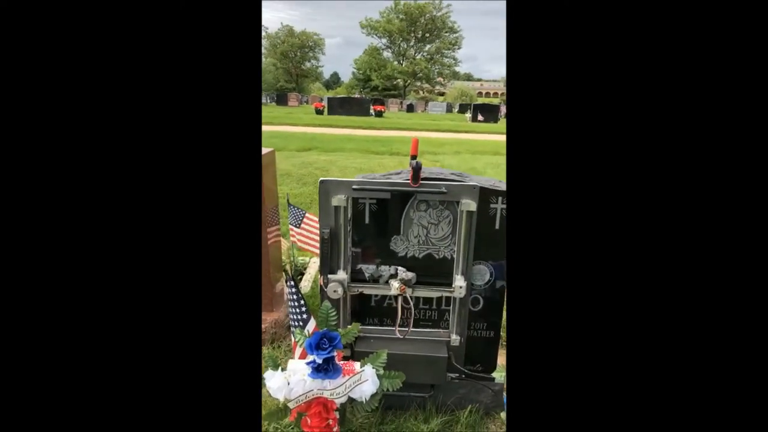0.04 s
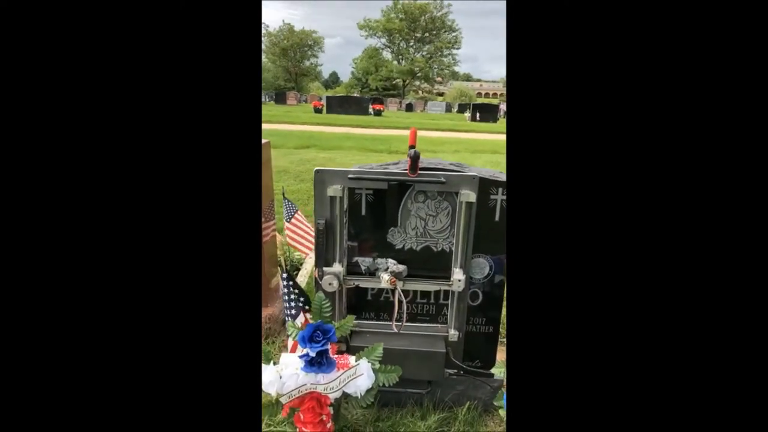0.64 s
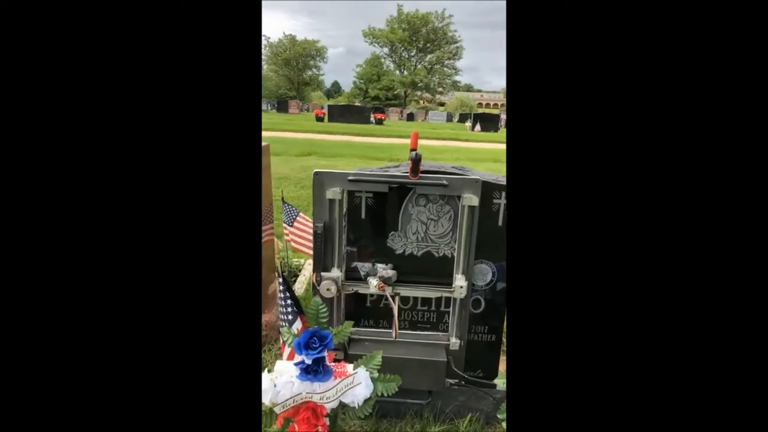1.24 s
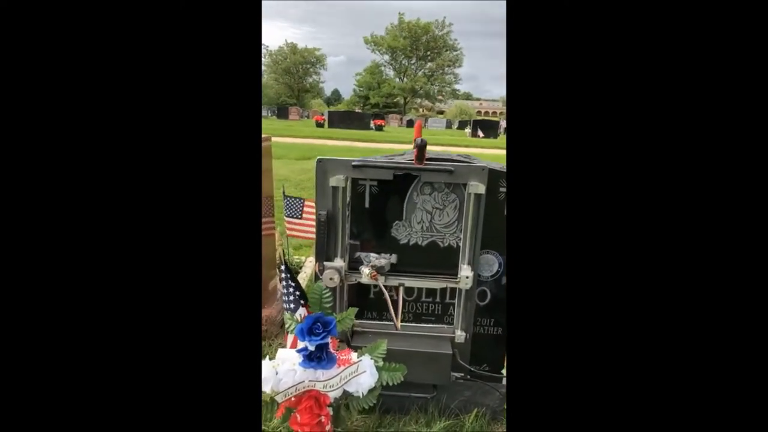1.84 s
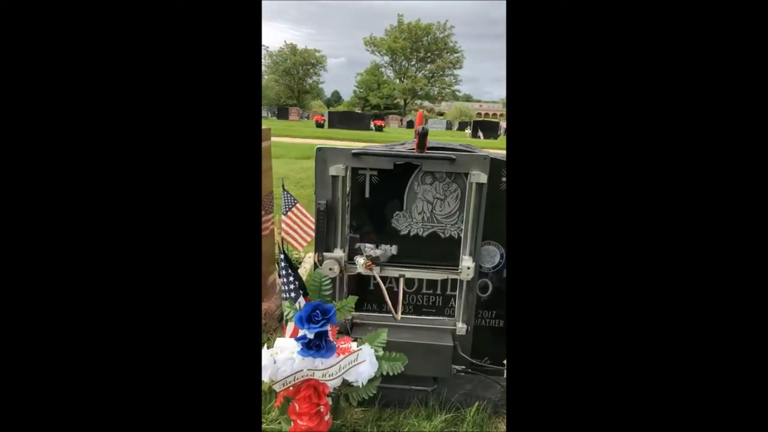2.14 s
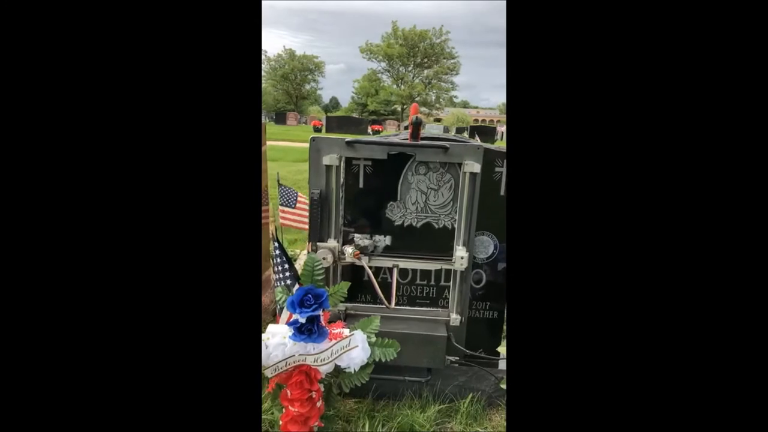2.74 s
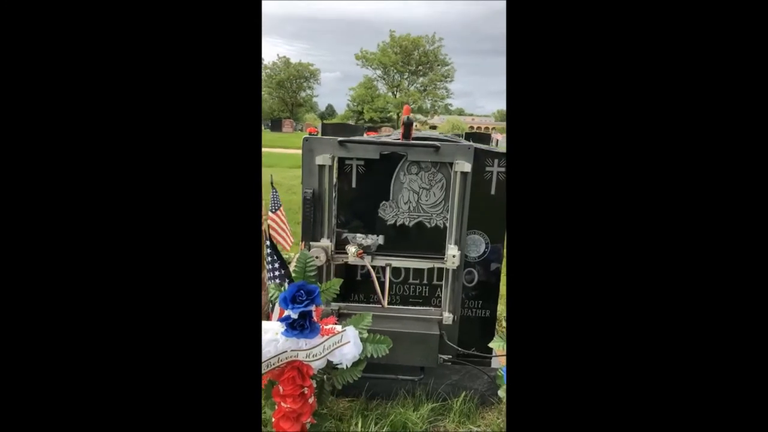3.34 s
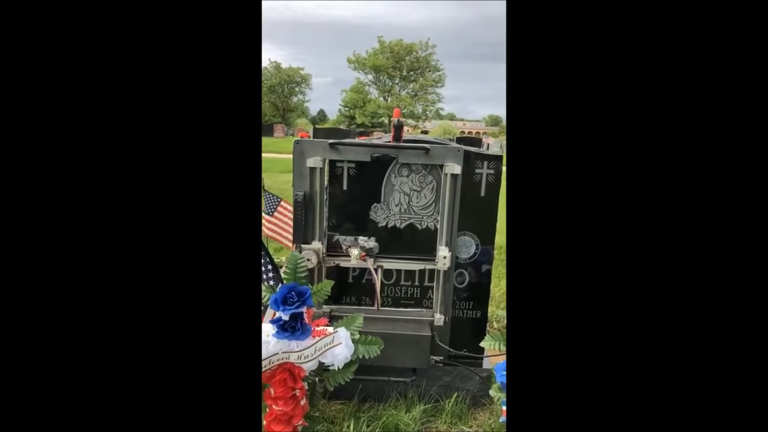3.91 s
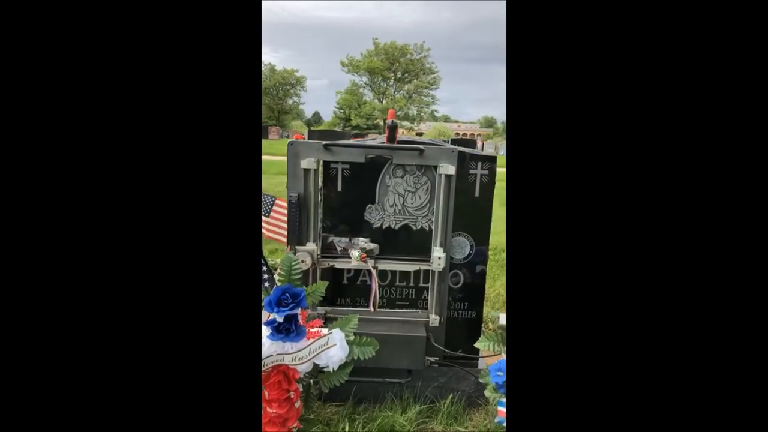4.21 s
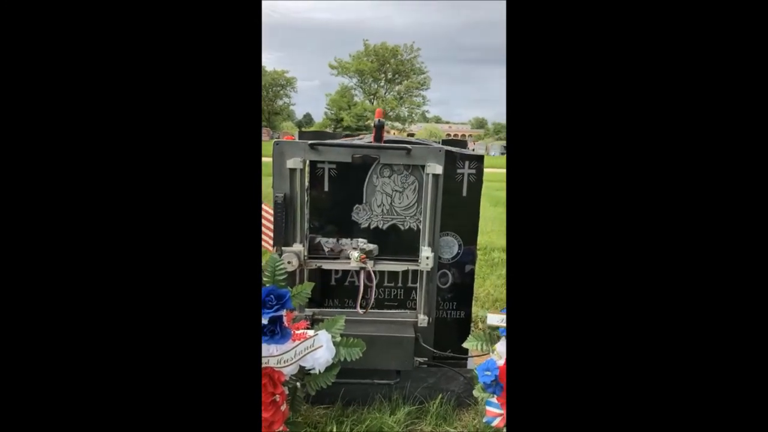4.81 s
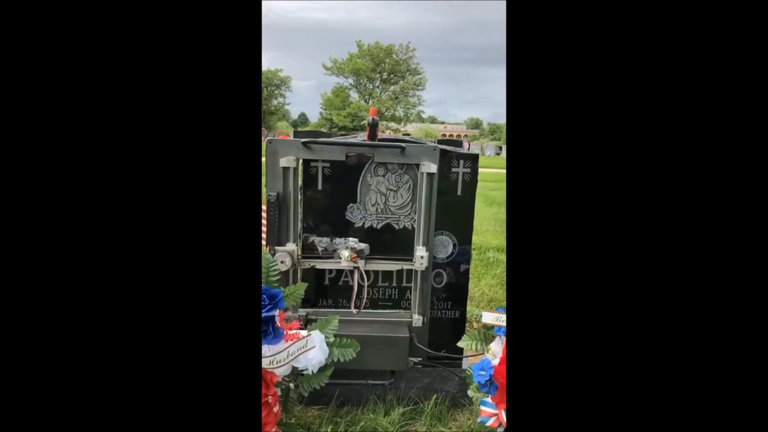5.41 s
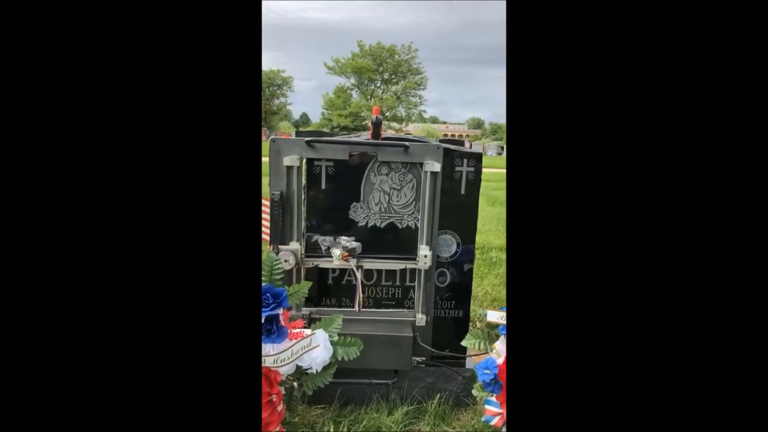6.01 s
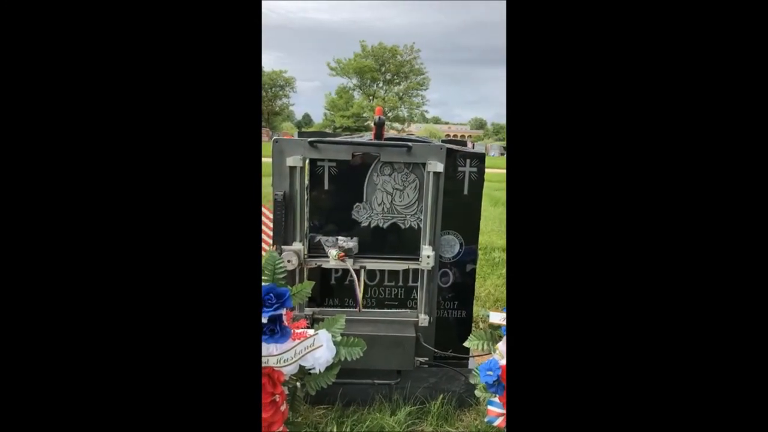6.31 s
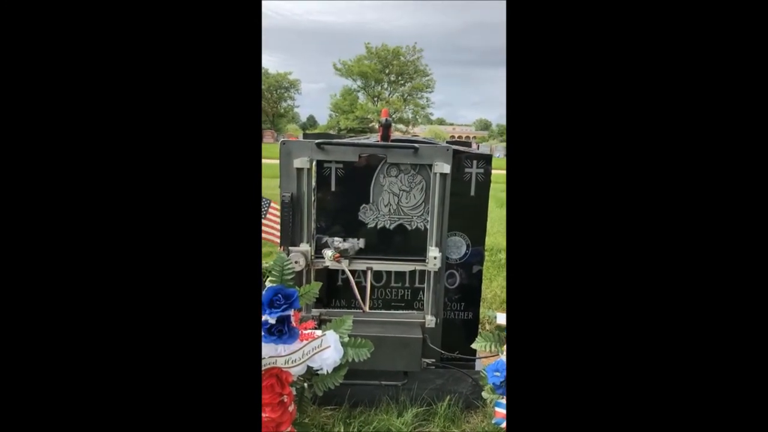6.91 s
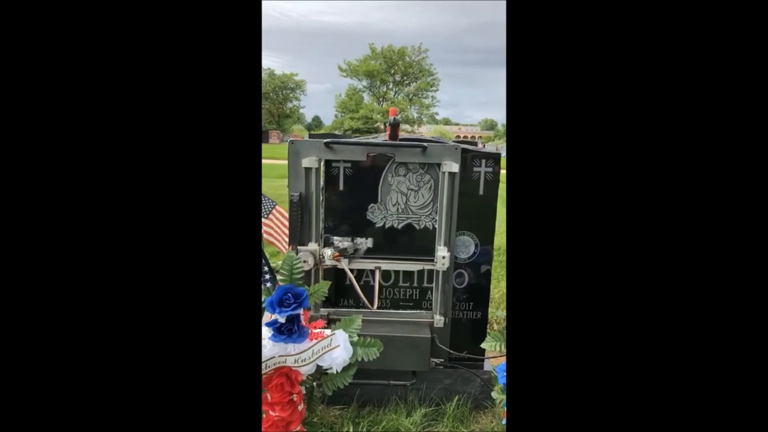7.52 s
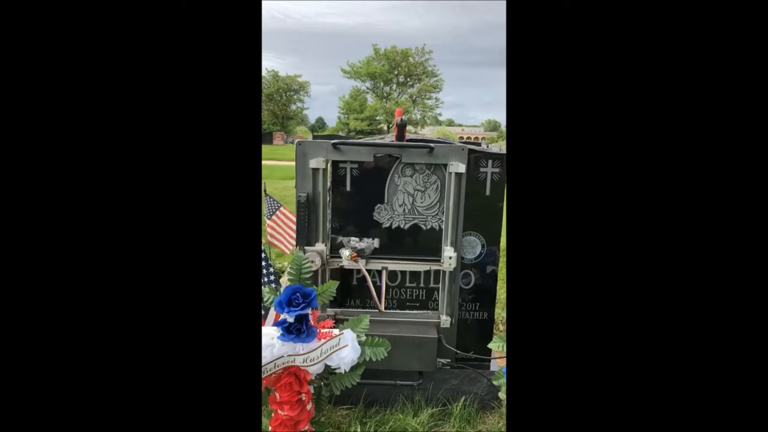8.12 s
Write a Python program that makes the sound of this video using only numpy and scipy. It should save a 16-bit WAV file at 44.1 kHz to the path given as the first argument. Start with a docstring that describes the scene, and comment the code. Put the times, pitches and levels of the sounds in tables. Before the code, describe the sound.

Gusts of wind thump and rumble on the microphone while a nearby machine engraves granite in the open air. The tip gives a rasping, crunchy buzz with a bright metallic ring, running throughout in uneven strokes and sometimes digging in with a sharper scratch. The wind is light at first, blows hardest through the middle and later part, and dies down near the end as the buzzing carries on.

```python
"""Outdoors, a step or two from a polished granite headstone, where an impact engraver is at work.
Its tip hammers hundreds of times a second. Brittle fracture of the stone gives a broadband crunch,
and the blows excite the modes of the stylus, metal head, rails and frame; the ringing changes as the
carriage shifts. Turbulent gusts buffet the microphone with puffs, thumps and a low rumble,
over a faint wash of open air."""
import sys
import numpy as np
from scipy import signal
from scipy.fft import rfft, irfft, next_fast_len
from scipy.io import wavfile
from scipy.ndimage import uniform_filter1d

SR = 44100
rng = np.random.default_rng(int(sys.argv[2]) if len(sys.argv) > 2 else 0)


def wav_out(sig):
    """Save sig, one row per channel (or a flat mono array), as 16-bit PCM at SR to the path in sys.argv[1]."""
    wavfile.write(sys.argv[1], SR, np.round(np.clip(np.atleast_2d(sig).T, -1, 1) * 32767).astype(np.int16))


N = 359415
TIME = np.arange(N) / SR
BINS_HZ = np.fft.rfftfreq(4096, 1 / SR)

# Levels in the tables are relative; each source applies its own gain.
# Spectrum of the open air: frequency_hz, density_db
AIR_SPECTRUM = [(20, -49), (70, 8), (200, -9.5), (450, -1.5), (800, -7), (1300, -9), (3000, -57),
                (12000, -8)]
# Spectrum of the large eddies: frequency_hz, density_db
RUMBLE_SPECTRUM = [(20, -51), (30, -17), (45, -7), (70, -1.5), (110, -4), (180, -13.5), (400, -40),
                   (1000, -84)]
# Spectra of the wind in a lull, a gust and a squall: frequency_hz, density_db
LULL_SPECTRUM = [(30, -44), (80, 1.5), (170, 2.5), (270, -3), (480, -8.5), (800, -23.5), (1500, -69),
                 (4000, -79)]
GUST_SPECTRUM = [(30, -23), (80, -12.5), (170, 2.5), (350, -4.5), (500, -2.5), (850, -16.5), (1300, -31.5),
                 (2000, -53), (4000, -45)]
SQUALL_SPECTRUM = [(30, -40), (80, 8.5), (170, 3.5), (350, 0.5), (500, 2), (850, -10.5), (1300, -16),
                   (2000, -21.5), (4000, -50)]
# The breeze between puffs: time_s, level_db
BREEZE_LEVELS = [(0, -71.5), (.42, -78.5), (.55, -66), (1.05, -75), (1.8, -68), (2.2, -74.5), (2.55, -71),
                 (2.9, -62), (3.7, -61.5), (4.4, -71), (5.3, -73), (6.1, -66), (6.7, -63), (6.9, -73),
                 (7.7, -77.5), (8.15, -72.5)]
# Puffs of wind on the microphone: middle_s, length_s, level_db, thud_db
WIND_PUFFS = [(0.309, 0.026, -65, -77), (0.516, 0.088, -48.5, -58), (0.585, 0.14, -55, -58),
              (0.665, 0.03, -51, -54), (0.699, 0.048, -54.0, -71), (0.781, 0.056, -48.5, -53),
              (0.881, 0.11, -54.5, -60), (0.971, 0.079, -52.5, -61), (1.036, 0.064, -53.5, -58.5),
              (1.197, 0.1, -56.5, -58), (1.382, 0.04, -58.5, -72), (1.432, 0.026, -59, -77),
              (1.49, 0.038, -62, -78), (1.588, 0.07, -60.5, -71), (1.714, 0.064, -71, -73),
              (2.07, 0.086, -65, -78), (2.353, 0.033, -60, -69), (2.428, 0.022, -61.5, -80),
              (2.507, 0.077, -64.5, -78), (2.665, 0.046, -51, -57), (2.779, 0.035, -47.5, -65),
              (2.863, 0.12, -50, -54.5), (2.996, 0.056, -51, -53), (3.065, 0.071, -46.0, -62),
              (3.183, 0.19, -55.5, -56), (3.326, 0.045, -44.5, -58), (3.398, 0.03, -54.5, -63),
              (3.495, 0.067, -51, -51.5), (3.63, 0.083, -43, -51), (3.737, 0.12, -42.5, -54),
              (3.837, 0.042, -42.5, -55), (3.969, 0.041, -48.5, -68), (4.047, 0.065, -46.0, -64),
              (4.116, 0.069, -45.5, -60), (4.286, 0.15, -52.5, -76), (4.483, 0.088, -55, -59),
              (4.597, 0.071, -48, -52), (4.659, 0.03, -46.5, -64), (4.716, 0.12, -54, -55.5),
              (4.895, 0.078, -51.5, -68), (5.014, 0.063, -49, -61), (5.129, 0.046, -47.5, -57),
              (5.325, 0.12, -61.5, -67.5), (5.5, 0.099, -51, -65), (5.58, 0.055, -48.5, -67),
              (5.655, 0.089, -48.0, -67), (5.691, 0.045, -56.0, -64), (5.749, 0.11, -53, -66),
              (5.869, 0.043, -49.5, -72), (5.947, 0.092, -48.5, -66), (6.05, 0.047, -43.5, -68),
              (6.138, 0.11, -45.5, -48.5), (6.205, 0.042, -47, -72), (6.294, 0.092, -45.5, -63),
              (6.367, 0.031, -47, -45), (6.433, 0.037, -44, -51), (6.51, 0.1, -49.5, -62),
              (6.584, 0.081, -50, -56), (6.694, 0.065, -46.5, -57), (6.773, 0.1, -49.5, -53),
              (6.916, 0.04, -53.5, -57), (6.982, 0.077, -53, -62), (7.03, 0.099, -57, -79),
              (7.12, 0.046, -53.5, -65), (7.193, 0.06, -54.5, -69), (7.28, 0.069, -60, -74),
              (7.35, 0.036, -57, -72), (7.448, 0.076, -56.5, -61.5), (7.56, 0.091, -60.5, -70),
              (7.799, 0.026, -54, -55), (8.035, 0.097, -68, -76)]
# Single eddies that strike the microphone: middle_s, level_db, pitch_hz
EDDY_STRIKES = [(0.545, -38, 537), (0.664, -34.5, 490), (0.905, -40, 370), (1.025, -37, 317),
                (1.05, -40.5, 337), (2.665, -38, 304), (2.845, -36, 415), (3.045, -33.5, 534),
                (3.081, -35, 533), (3.311, -34.5, 383), (3.343, -32, 388), (3.49, -36, 433),
                (3.607, -30.5, 452), (3.632, -33, 456), (3.648, -28, 540), (3.733, -27, 617),
                (3.744, -31, 616), (3.774, -32, 457), (3.843, -34, 570), (4.061, -33, 664),
                (4.109, -40, 370), (4.564, -38.5, 380), (4.594, -42, 490), (5.497, -35, 395),
                (5.564, -40.5, 453), (5.582, -36, 510), (5.925, -36.5, 490), (6.047, -35, 338),
                (6.139, -31, 386), (6.218, -36.5, 396.6), (6.281, -37, 484), (6.312, -32.5, 800),
                (6.362, -33.5, 476), (6.433, -28.5, 517), (6.473, -34, 470), (6.59, -38, 494),
                (6.698, -28.5, 540), (6.8, -35, 423), (6.962, -32.5, 310)]
# Cuts, with the tip down on the stone: start_s, length_s, start_db, end_db
TIP_CUTS = [(-0.008, 0.21, -53.5, -55.5), (0.195, 0.076, -63.5, -57), (0.354, 0.28, -58.5, -54),
            (0.764, 0.17, -55.5, -55.5), (1.032, 0.22, -54, -57), (1.306, 0.082, -56, -55),
            (1.48, 0.062, -57.5, -52), (1.545, 0.041, -55, -49), (1.606, 0.065, -51.5, -55.4),
            (1.687, 0.11, -58, -52), (1.785, 0.1, -55.5, -53.5), (1.902, 0.073, -60, -53),
            (1.978, 0.387, -54.5, -58), (2.339, 0.32, -56, -59.6), (2.807, 0.35, -58.5, -56.5),
            (3.153, 0.35, -56.0, -55), (3.617, 0.18, -54, -57.5), (3.8, 0.048, -56.5, -54.5),
            (3.864, 0.14, -60, -61), (4.07, 0.13, -56.5, -57.5), (4.2, 0.24, -57.5, -54),
            (4.529, 0.184, -56.1, -55.0), (4.845, 0.28, -51.5, -61.5), (5.18, 0.31, -61.6, -52),
            (5.618, 0.16, -55.0, -52), (5.866, 0.17, -55, -62.5), (5.979, 0.18, -55.0, -62.5),
            (6.173, 0.087, -53, -70), (6.51, 0.234, -60, -56), (6.793, 0.073, -56, -68),
            (6.877, 0.32, -58.5, -57), (7.2, 0.33, -56, -60), (7.702, 0.45, -58.5, -57)]
# Moments when the tip digs in hard: peak_s, level_db
TIP_DIGS = [(0.776, -60), (1.138, -52.5), (1.319, -56), (1.69, -50.5), (2.014, -54), (2.042, -54),
            (2.799, -54), (2.848, -60), (3.316, -51), (3.485, -51), (3.769, -60), (3.827, -57),
            (3.89, -48.5), (4.545, -58), (4.563, -52), (4.987, -54), (5.041, -52.5), (5.198, -58),
            (5.743, -58), (5.791, -51), (6.0, -55), (6.178, -53.5), (6.369, -52), (6.432, -50),
            (6.492, -49.5), (6.573, -58), (6.616, -53), (6.668, -59), (6.774, -53), (6.962, -57),
            (7.195, -52.5), (7.784, -53.5), (7.972, -55.5)]
# Spectrum of crumbling granite: frequency_hz, density_db
CRUNCH_SPECTRUM = [(200, -20.5), (800, -5), (1500.0, -5.5), (2000.0, -7), (2700.0, -3), (3800.0, 2.5),
                   (4600.0, 1), (5600.0, 1.5), (7200.0, 4), (8600.0, 3), (9600.0, -1.5), (10400.0, -1.5),
                   (11700.0, -3)]
# Carriage travel and how freely the head rings: time_s, rail_place (above 2 acts as 2), ring_db
CARRIAGE_PATH = [(0, 0.26, 1), (.9, 0, 1.5), (1.3, 0.31, 0.5), (1.65, 0.67, -0.5), (1.95, 0.96, 0.5),
                 (2.4, 1.35, 3.5), (3.0, 1.3, 3.5), (3.2, 1.9, 1.5), (3.65, 2, 1), (5.0, 2.77, 1),
                 (6.8, 2.8, 2), (7.05, 1.85, 3), (7.3, 1.66, 2.5), (8.15, 1.68, 3)]
# Modes of the head and rails: pitch_hz, width_hz, place_0_db, place_1_db, place_2_db
HEAD_MODES = [(1820, 180, 3, -4, -18), (2030, 300, -18, 2, 2), (2450, 160, 6, 9, 0), (2610, 190, -18, 1, 8),
              (2795, 160, 15, 12, 17), (2900, 140, 13, -8, 14), (3030, 150, 11, -6, 11),
              (3170, 260, -18, 9, 5), (3550, 170, 13, 0, 7), (3750, 260, 3, 3, -16), (4110, 340, -4, 1, 3),
              (4980, 340, 2, 1, 1), (5390, 130, 1, -3, 5), (5640, 240, 8, 4, 4), (6170, 360, 0, 4, 4),
              (6690, 380, 3, -3, 0), (7930, 380, 3, 6, 6), (8460, 380, 2, 5, 5), (8970, 260, 11, 10, 5),
              (9360, 380, 2, 2, -3), (9720, 380, 2, 2, 2), (10200, 260, 2, -4, -4), (10700, 150, 4, 0, 0),
              (11000, 130, -2, 0, 0), (11420, 220, 3, 3, 3)]
# Two close modes of the stylus: pitch_hz, width_hz
STYLUS_MODES = [(5520, 170), (6050, 170)]
# How the strokes excite the stylus: time_s, lower_mode_db, upper_mode_db
STYLUS_STROKES = [(0, 6, -10), (1.2, -5, -18), (1.7, 13, -20), (2.05, 3, 9), (2.3, 0, -13),
                  (2.65, 10.5, -19), (3.3, -2, -8), (3.75, 13, -8), (4.25, -12, -4), (4.7, 12, -8),
                  (5.05, 1, -10), (5.5, 9, -8), (6.1, 7, -10), (6.65, 15.5, -5), (7.05, 3.5, 12),
                  (7.6, 13.5, -12), (8.15, 7, 14)]


def gain_of(db):
    """Amplitude ratio of a level in decibels."""
    return 10 ** (np.asarray(db) / 20)


def unit_rms(x):
    """Normalisation to an rms of 1."""
    return x / np.sqrt(np.mean(x ** 2) + 1e-20)


def curves(rows):
    """Linear interpolation in time: one curve for each column after time_s."""
    times, *columns = np.transpose(rows)
    return [np.interp(TIME, times, column) for column in columns]


def around(time_s, reach_s):
    """The samples within reach of a moment."""
    return slice(max(round((time_s - reach_s) * SR), 0), round((time_s + reach_s) * SR))


def poisson_times(per_s):
    """Poisson process: independent random moments, in seconds."""
    return TIME[rng.random(N) < per_s / SR]


def wander(slow_hz, fast_hz):
    """Band-limited random motion with an rms of 1."""
    hz = np.fft.rfftfreq(N, 1 / SR)
    band = hz ** 2 / (hz ** 2 + slow_hz ** 2) / np.sqrt(1 + (hz / fast_hz) ** 4)
    return unit_rms(irfft(rfft(rng.standard_normal(N)) * band, N))


def response(spectrum):
    """Gain at every bin, interpolated in decibels over log frequency."""
    hz, db = np.transpose(spectrum)
    return gain_of(np.interp(np.log(BINS_HZ + 1), np.log(hz), db))


def resonance(pitch_hz, width_hz):
    """Lorentzian peak of one damped mode, as a gain at every bin."""
    return 1 / (1 + 2 * ((BINS_HZ - pitch_hz) / width_hz) ** 2)


def colour(x, gain):
    """Minimum-phase filter: the phase follows from the log gain by the Hilbert transform."""
    log_gain = np.log(np.maximum(gain, 1e-5))
    mirrored = np.concatenate([log_gain, log_gain[-2:0:-1]])
    taps = np.fft.ifft(np.exp(signal.hilbert(mirrored).conj())).real
    return signal.oaconvolve(x, taps)[:N]


def open_air(level_db=-70):
    """Stationary coloured noise: the soft, distant wash of the outdoors."""
    return gain_of(level_db) * unit_rms(colour(rng.standard_normal(N), response(AIR_SPECTRUM)))


def turbulence(drive, spectrum, compression):
    """Random pressure swings, evened in size by compression of their envelope."""
    swings = signal.hilbert(colour(drive, response(spectrum)), next_fast_len(N))[:N]
    envelope = np.sqrt(abs(uniform_filter1d(abs(swings) ** 2, size=700)) + 1e-12)
    return unit_rms(swings.real / envelope ** compression)


def rumble(trim_db=-0.6, calm_db=-75, lag_s=0.023, spread_s=0.0059, lumps_db=4):
    """Large eddies vary the pressure slowly: a low thud trails each puff, over a faint rumble."""
    power = np.full(N, gain_of(calm_db) ** 2)
    for middle_s, length_s, _, thud_db in WIND_PUFFS:
        near = around(middle_s + lag_s, length_s + .05)
        swell = np.exp(-((TIME[near] - middle_s - lag_s) / (length_s / 2 + spread_s)) ** 2)
        power[near] += (gain_of(thud_db + trim_db) * swell) ** 2
    lumps = unit_rms(gain_of(lumps_db * wander(13, 26)))
    return np.sqrt(power) * lumps * turbulence(rng.standard_normal(N), RUMBLE_SPECTRUM, compression=0.28)


def wind_strength(trim_db=-1.17, abruptness=3.7):
    """Incoherent sources add in power: the level in dB of the breeze plus flat-topped puffs."""
    breeze_db, = curves(BREEZE_LEVELS)
    power = gain_of(breeze_db) ** 2
    for middle_s, length_s, level_db, _ in WIND_PUFFS:
        near = around(middle_s, length_s)
        swell = np.exp(-abs(2 * (TIME[near] - middle_s) / length_s) ** abruptness)
        power[near] += (gain_of(level_db + trim_db) * swell) ** 2
    return 10 * np.log10(power)


def wind(strength_db, lull_db=-66, gust_db=-50, squall_db=-40, trim_db=-0.5):
    """Turbulence at the microphone port: its spectrum brightens as the wind blows harder."""
    eddies = rng.standard_normal(N)
    roar = np.zeros(N)
    for spectrum, weights in zip([LULL_SPECTRUM, GUST_SPECTRUM, SQUALL_SPECTRUM], np.eye(3)):
        share = np.interp(strength_db, [lull_db, gust_db, squall_db], weights)
        roar += share * turbulence(eddies, spectrum, compression=0.37)
    depth_db = np.interp(strength_db, [lull_db, gust_db], [3.5, 4.0])
    flutter_db = depth_db * np.clip(wander(16, 42), -2, 2)
    return gain_of(strength_db + trim_db + flutter_db) * roar


def buffets(strength_db, eddies_per_s=7.3, eddy_hz=450, width_cycles=0.81, fall=0.54, trim_db=-3.5):
    """A passing eddy is a wave packet: a thump of two or three swings that falls in pitch."""
    pitches_hz = eddy_hz * np.exp(0.33 * rng.standard_normal(N))
    phases = rng.random(N)
    # lesser eddies ride on the wind wherever it is strong enough
    moments = (poisson_times(eddies_per_s) * SR).astype(int)
    lesser = [(TIME[i], strength_db[i] + 4, pitches_hz[i]) for i in moments if strength_db[i] > -60]
    thumps = np.zeros(N)
    for (middle_s, level_db, pitch_hz), phase in zip(EDDY_STRIKES + lesser, phases):
        near = around(middle_s, .02)
        cycles = np.log(np.maximum(1 + fall * pitch_hz * (TIME[near] - middle_s), 1e-6)) / fall
        envelope = gain_of(level_db + trim_db) * np.exp(-.5 * (cycles / width_cycles) ** 2)
        thumps[near] += envelope * np.cos(2 * np.pi * (cycles + phase))
    return thumps


def tip_force(skim_db=-62.5, cut_trim_db=-1.62, land_s=.008, lift_s=0.024, flutter_db=1.42,
              random_digs_per_s=7, random_dig_db=-56, dig_rise_s=0.0028, dig_fall_s=0.0038):
    """Envelope of the contact force: the tip skims, lands, cuts and lifts, and at times digs in."""
    power = np.full(N, gain_of(skim_db) ** 2)
    contact = np.zeros(N)
    for start_s, length_s, start_db, end_db in TIP_CUTS:
        near = around(start_s + length_s / 2, length_s / 2)
        t, end_s = TIME[near], start_s + length_s
        down = np.clip(np.minimum((t - start_s) / land_s, (end_s - t) / lift_s), 0, 1)
        cut_db = np.interp(t, [start_s, end_s], [start_db, end_db]) + cut_trim_db
        power[near] += (gain_of(cut_db) * down) ** 2
        contact[near] += down
    # the tip skips over the grain of the stone and, while cutting, digs in further times at random moments
    power *= unit_rms(gain_of(flutter_db * wander(15, 100))) ** 2
    random_digs = [(s, random_dig_db) for s in poisson_times(random_digs_per_s) if contact[int(s * SR)] > .5]
    for peak_s, level_db in TIP_DIGS + random_digs:
        near = around(peak_s, .02)
        since_s = TIME[near] - peak_s
        half_power_s = np.where(since_s < 0, dig_rise_s, dig_fall_s)
        power[near] += gain_of(level_db) ** 2 * .5 ** ((since_s / half_power_s) ** 2)
    return np.sqrt(power)


def hammering(blows_per_s=620, unevenness=.25, spread_db=2, crumble_s=0.00047, scrape=0.7):
    """Impact excitation: uneven blows, each a decaying burst of breaking grains, over a steady scrape."""
    blow_count = np.cumsum(blows_per_s * np.exp(unevenness * wander(5.8, 300))) / SR
    onsets = np.diff(np.floor(blow_count), prepend=0)
    energies = onsets * gain_of(spread_db * rng.standard_normal(N)) ** 2
    power = signal.lfilter([1], [1, -np.exp(-1 / (crumble_s * SR))], energies)
    return unit_rms(np.sqrt(power / power.mean() + scrape ** 2) * rng.standard_normal(N))


def frame_ring(machine, t60_s=0.04, gain_db=-13, tail_count=8):
    """Dense frame modes act as a decaying noise response: a steely ring whose fine colour drifts slowly over
    time."""
    t = np.arange(SR // 20) / SR
    tails = rng.standard_normal((tail_count, len(t))) * gain_of(-60 * t / t60_s)
    place = np.linspace(0, tail_count - 1, N)  # a steady crossfade through the responses
    ring = np.zeros(N)
    for k, tail in enumerate(tails):
        share = np.sqrt(np.maximum(1 - abs(place - k), 0))
        ring += signal.oaconvolve(machine * share, tail / np.linalg.norm(tail))[:N]
    return gain_of(gain_db) * ring


def granite_crunch(force, gain_db=-0.46):
    """Brittle fracture: grains crushed under the tip radiate broadband noise."""
    return gain_of(gain_db) * force * colour(hammering(), response(CRUNCH_SPECTRUM))


def head_ring(force, gain_db=-0.4):
    """Forced vibration of the head and rails: the mix of modes depends on where the carriage is."""
    place, ring_db = curves(CARRIAGE_PATH)
    drive = hammering() * force * gain_of(ring_db)
    ring = np.zeros(N)
    for k in range(3):
        power = sum((gain_of(db[k]) * resonance(hz, width)) ** 2 for hz, width, *db in HEAD_MODES)
        nearness = np.maximum(1 - abs(np.clip(place, 0, 2) - k), 0)
        ring += nearness * colour(drive, np.sqrt(power))
    return gain_of(gain_db) * ring


def stylus_ring(force, gain_db=3.5):
    """Bending resonance: each stroke excites the two modes of the stylus in its own proportion."""
    drive = hammering() * force
    ring = np.zeros(N)
    for mode, level_db in zip(STYLUS_MODES, curves(STYLUS_STROKES)):
        ring += gain_of(level_db) * colour(drive, resonance(*mode))
    return gain_of(gain_db) * ring


def engraver(full_bite_db=-55, crunch_growth=1.04, ring_growth=0.94):
    """Nonlinear contact: with harder blows the crunch grows slightly faster than the ringing."""
    force = tip_force() / gain_of(full_bite_db)
    crunch = granite_crunch(force ** crunch_growth)
    ring_force = force ** ring_growth
    return gain_of(full_bite_db) * (crunch + head_ring(ring_force) + stylus_ring(ring_force))


def scene():
    """Superposition of the machine, the wind and the open air at one microphone."""
    machine = engraver()
    strength_db = wind_strength()
    mix = machine + frame_ring(machine) + wind(strength_db) + rumble() + buffets(strength_db) + open_air()
    return mix[None]


def record(dry, bass_cut_hz=40, band_limit_hz=11760):
    """Band limiting: the microphone cuts the deep bass and the recorder the highest treble."""
    highpass = signal.butter(4, bass_cut_hz, "highpass", fs=SR, output="sos")
    lowpass = signal.firwin(511, band_limit_hz, window=("kaiser", 9), fs=SR)
    return signal.oaconvolve(signal.sosfilt(highpass, dry), lowpass[None], "same")


dry = scene()
out = record(dry)
wav_out(out)
```